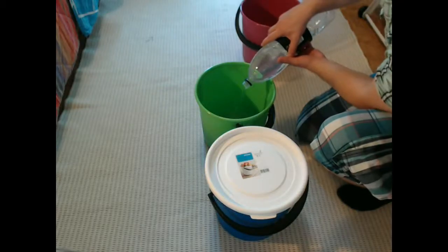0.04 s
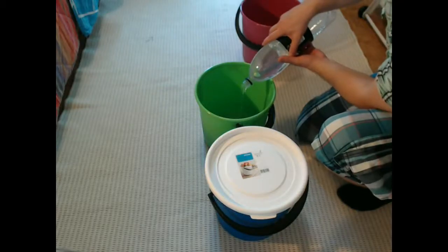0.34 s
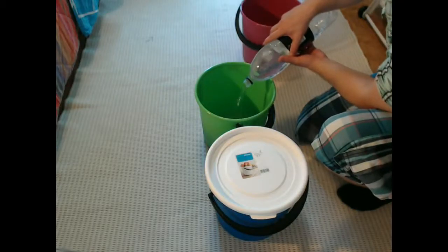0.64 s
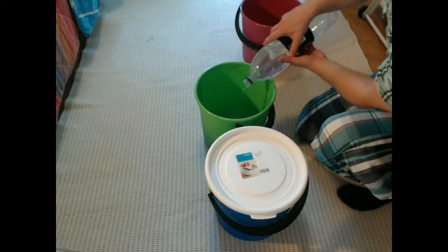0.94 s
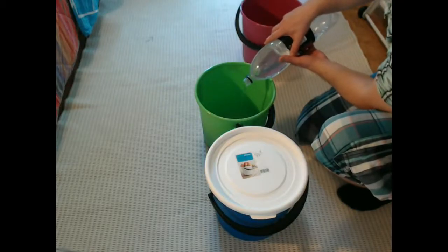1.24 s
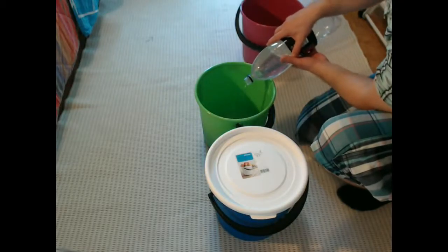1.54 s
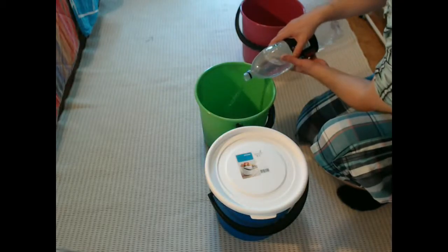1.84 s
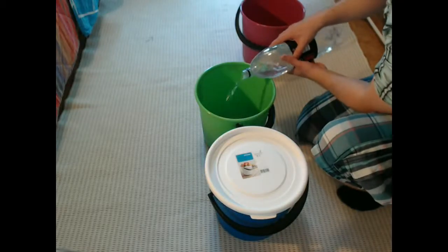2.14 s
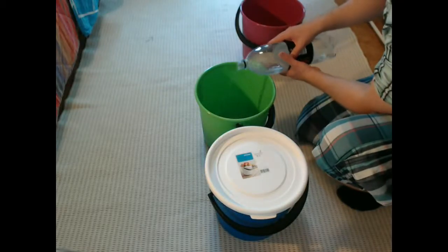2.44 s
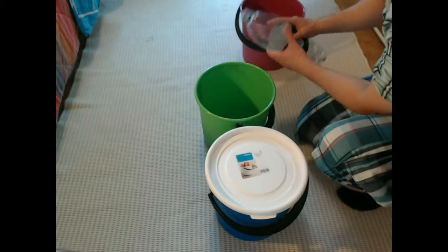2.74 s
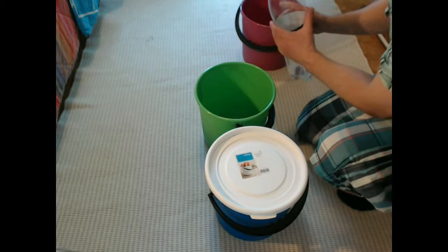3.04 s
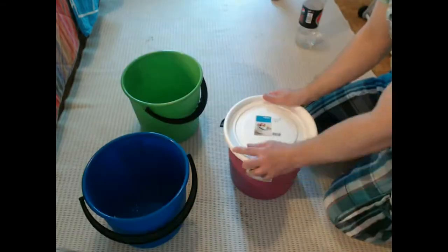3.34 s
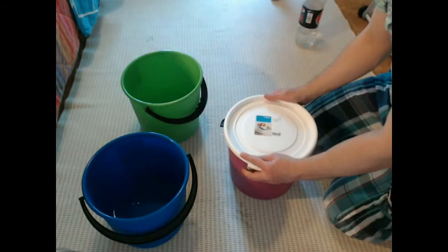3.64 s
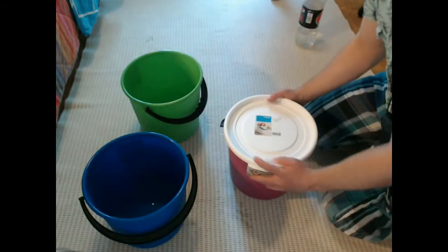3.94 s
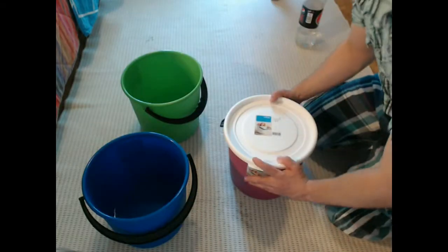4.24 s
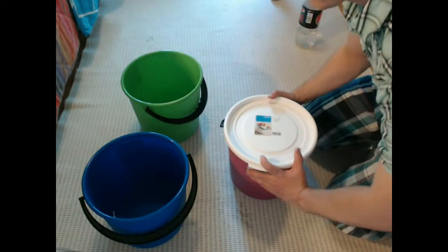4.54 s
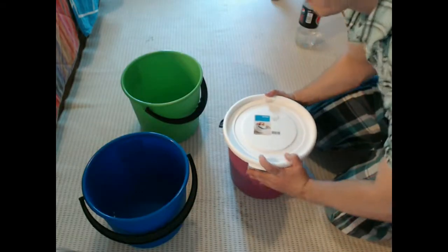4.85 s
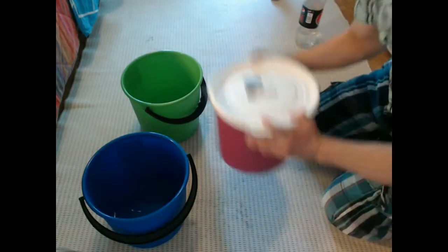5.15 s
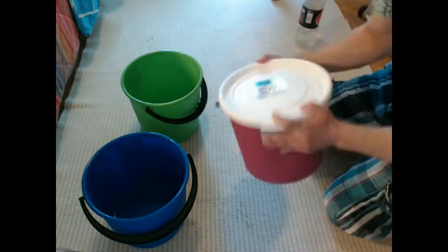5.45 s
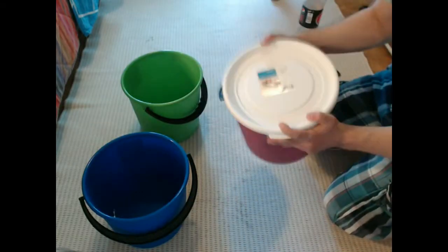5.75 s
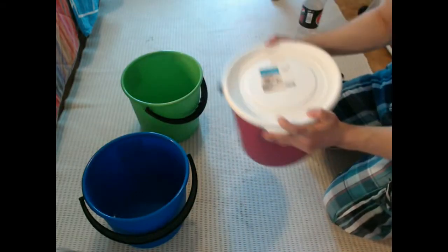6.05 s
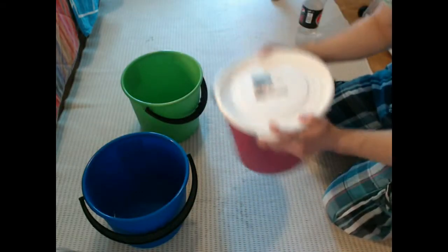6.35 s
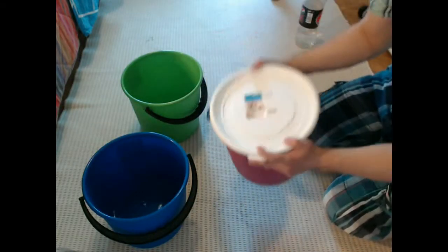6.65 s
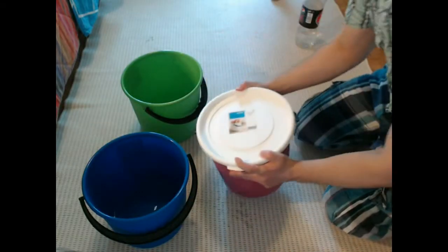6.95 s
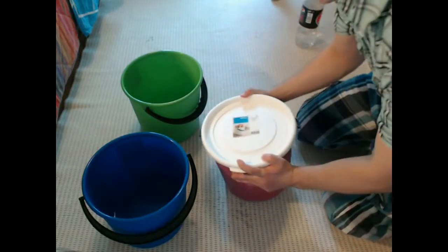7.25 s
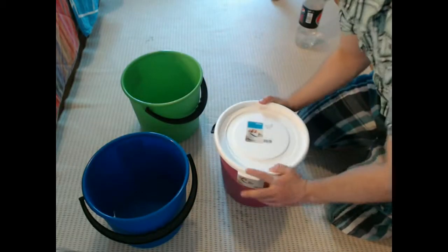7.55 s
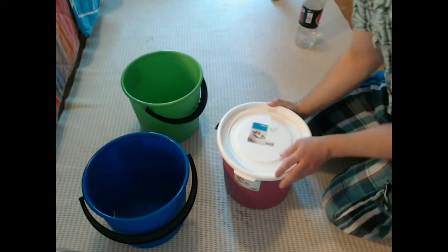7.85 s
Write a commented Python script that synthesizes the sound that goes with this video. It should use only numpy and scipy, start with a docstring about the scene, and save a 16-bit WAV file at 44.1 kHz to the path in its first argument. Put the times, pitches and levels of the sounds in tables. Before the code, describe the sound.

Liquid glugs from a bottle into a plastic bucket, then a lid is pressed on a bucket and liquid is shaken inside with hollow booms.

```python
"""Liquid glugs from a plastic bottle into an empty plastic bucket in a small room: it drums on the
bottom, churns up bubbles and spits drops. Hands rub and knock on the plastic as they press a lid onto
a bucket, lift it and shake it; the liquid slaps the walls and the lid booms like a drum head.
The bucket is set down on a mat, and at the very end a shower head sprays into a bucket."""
import sys
import numpy as np
from scipy import signal
from scipy.fft import rfft, irfft, next_fast_len
from scipy.io import wavfile

SR = 44100
rng = np.random.default_rng(int(sys.argv[2]) if len(sys.argv) > 2 else 0)


def file_out(sig):
    """Save sig as 16-bit WAV at sys.argv[1]."""
    # one column per channel
    cols = np.atleast_2d(sig).T
    # limit, then scale
    lim = np.clip(cols, -1, 1)
    pcm = np.round(lim * 32767).astype(np.int16)
    wavfile.write(sys.argv[1], SR, pcm)


N = 357252
T = np.arange(N) / SR
TOP_HZ = 16100


def amp(db):
    return 10 ** (np.asarray(db) / 20)


def unit_rms(x):
    return x / np.sqrt(np.mean(x ** 2) + 1e-20)


def at_hz(table, hz):
    table_hz, values = np.transpose(table)
    return np.interp(np.log(hz + 1), np.log(table_hz + 1), values)


def add(mix, start_s, sound):
    part = mix[max(round(start_s * SR), 0):][:len(sound)]
    part += sound[:len(part)]


def decay(t, hold_s, t60_s):
    return np.exp(-np.log(1000) * np.maximum(t - hold_s, 0) / t60_s)


def swell(t, rise_s, t60_s):
    """Smooth rise to 1, then exponential decay."""
    return np.sin(np.pi / 2 * np.clip(t / rise_s, 0, 1)) ** 2 * decay(t, rise_s, t60_s)


def coloured(x, spectrum):
    """x shaped by a spectrum table; rms 1."""
    size = next_fast_len(N)
    gain = amp(at_hz(spectrum, np.fft.rfftfreq(size, 1 / SR)))
    return unit_rms(irfft(rfft(x, size) * gain, size)[:N])


def filtered(x, hz, kind):
    """Low- or high-passed x; rms 1."""
    return unit_rms(signal.sosfilt(signal.butter(4, hz, kind, fs=SR, output="sos"), x))


def ring(modes):
    """Impulse response of damped modes; energy 1."""
    t = np.arange(SR // 3) / SR
    out = sum(amp(db) * swell(t, 1 / SR, t60_s) * np.cos(2 * np.pi * hz * t) for hz, db, t60_s in modes)
    return out / np.linalg.norm(out)


def impacts(per_s, spread_db):
    """Clicks of random time, size and sign."""
    size = amp(spread_db * np.minimum(rng.exponential(1, N), 3))
    return size * rng.choice([-1, 1], N) * (rng.random(N) < per_s / SR)


def bubble(hz, cycles, glide):
    """Sine falling to 1/e in `cycles`; its pitch climbs as the bubble nears the surface."""
    age = np.arange(int(5 * cycles / hz * SR) + 2) * hz / cycles / SR
    return np.exp(-age) * np.sin(2 * np.pi * cycles * age * (1 + glide * age))


def bubbles(per_s, spread_db, low_hz, high_hz, cycles, glide, sizes=48):
    """Stream of bubbles of many sizes, equal energy per Hz."""
    clicks = impacts(per_s, spread_db)
    size_index = rng.integers(0, sizes, N)
    onsets = np.flatnonzero(clicks)
    out = np.zeros(N)
    for k, hz in enumerate(np.geomspace(low_hz, high_hz, sizes)):
        grain = hz * bubble(hz, cycles, glide)
        starts = onsets[size_index[onsets] == k]
        samples = starts[:, None] + np.arange(len(grain))
        out += np.bincount(samples.ravel(), np.outer(clicks[starts], grain).ravel(), N)[:N]
    return out


# room air and rumble spectra: (frequency [Hz], gain [dB])
AIR_SPECTRUM = [(65, -48), (110, 1.5), (144, 5.5), (201, -2), (275, 1), (417, -10.5), (848, -18),
                (1370, -9.5), (2400, -32.5), (4980, -24.5), (6260, -31.5), (12000, -35), (16000, -38)]
RUMBLE_SPECTRUM = [(10, -23), (25, -1), (48, 3.5), (62, -16), (90, 0.5), (125, -11), (250, -54),
                   (1000, -80)]
# rumble envelope: (time [s], level [dB])
RUMBLE_LEVELS = [(0, -68), (1.5, -65.5), (2.2, -63), (3.1, -66), (5.2, -65), (7.6, -60), (8.1, -71)]

def background(air_db=-62):
    """Steady room air over a wavering rumble."""
    air, rumble = rng.standard_normal((2, N))
    times_s, levels_db = np.transpose(RUMBLE_LEVELS)
    rumble_gain = amp(np.interp(T, times_s, levels_db)) * (T <= times_s[-1])
    return amp(air_db) * coloured(air, AIR_SPECTRUM) + rumble_gain * coloured(rumble, RUMBLE_SPECTRUM)


# room reverberation: (frequency [Hz], t60 [s])
ROOM_DECAY = [(150, 0.32), (1000, 0.49), (4000, 0.34), (14000, 0.18)]

def room_tail(gap_s=0.002, taps_per_s=5000):
    """Sparse reflections, each band dying at its own rate; energy 1."""
    size = SR * 2 // 3
    taps = rng.standard_normal(size) * (rng.random(size) < taps_per_s / SR)
    taps *= np.arange(size) > gap_s * SR
    hz, t, bands = signal.stft(taps, SR, nperseg=256)
    bands = bands * decay(t, 0, at_hz(ROOM_DECAY, hz)[:, None])
    tail = signal.istft(bands, SR, nperseg=256)[1]
    return tail / np.linalg.norm(tail)


def room(x, tails=4, crossfade_hz=2):
    """Several crossfaded tails give a smooth, even small-room reverberation."""
    turns = crossfade_hz * T + np.arange(tails)[:, None] / tails
    shares = np.maximum(np.cos(2 * np.pi * turns), 0)
    return sum(signal.oaconvolve(x * share, room_tail())[:N] for share in shares)


# spray in a bucket: (frequency [Hz], gain [dB])
SHOWER_SPECTRUM = [(100, -37), (210, -34), (290, 8.5), (350, -19), (480, -11), (800, -24), (1240, -12.5),
                   (1900, -18.5), (8500, -21.5), (16000, -26.5)]

def shower(start_s=7.96, rise_s=0.0017, level_db=-44):
    """Many fine jets patter into a bucket."""
    patter = coloured(impacts(per_s=9000, spread_db=2), SHOWER_SPECTRUM)
    return amp(level_db) * patter * np.clip((T - start_s) / rise_s, 0, 1)


# friction on plastic: (frequency [Hz], gain [dB])
RUB_SPECTRUM = [(180, -25), (300, -26), (326, 8), (455, -5.5), (1150, 1.5), (1560, -4.5), (2100, -5),
                (2360, -12), (4300, -14.5), (6620, -27.5), (8360, -25.5), (14200, -36), (16000, -38)]
# hand and cloth strokes: (midpoint [s], length [s], rub gain [dB], hiss gain [dB])
HAND_STROKES = [(3.021, 0.18, -64.5, -69), (3.18, 0.18, -62, -66.5), (3.35, 0.2, -62.5, -62.5),
                (3.45, .08, -55.5, -70), (3.628, 0.2, -54.5, -59), (3.894, 0.32, -56, -62.5),
                (4.097, 0.25, -58, -58.5), (4.228, .14, -56.5, -68.5), (4.47, 0.53, -62.5, -82),
                (4.674, 0.29, -62.5, -69), (4.925, 0.51, -62.5, -87), (5.346, 0.12, -63, -75),
                (7.417, 0.23, -56.5, -78), (7.554, 0.19, -56, -73), (7.74, 0.42, -67.5, -82),
                (7.93, 0.3, -60, -63.5)]

def rubbing(speed_exponent=1.3):
    """Skin and cloth catch and slip in tiny steps; loudness follows the speed of the hand."""
    power = np.zeros((2, N))
    for middle_s, length_s, *gains_db in HAND_STROKES:
        speed = np.sin(np.linspace(0, np.pi, int(length_s * SR), endpoint=False))
        for layer, db in zip(power, gains_db):
            add(layer, middle_s - length_s / 2, (amp(db) * speed ** speed_exponent) ** 2)
    rub_gain, hiss_gain = np.sqrt(power)
    slips = coloured(impacts(per_s=5000, spread_db=3.5), RUB_SPECTRUM)
    return (amp(-3.5) * rub_gain * filtered(slips, 3500, "low")
            + amp(-1.5) * hiss_gain * filtered(slips, 5220, "high"))


# plastic rim: (frequency [Hz], gain [dB], t60 [s])
RIM_MODES = [(970, 14.5, 0.061), (1170, 19.5, 0.27), (1756, -25, 0.28), (2110, -13, 0.59),
             (2503, -46, 0.27), (3284, -27, 0.15), (3914, -63, 0.098)]
# knocks, and a brief scrape at 4.92 s: (time [s], gain [dB], rattle pitch [Hz], extra click gain [dB])
RIM_KNOCKS = [(3.022, -49, 1690, 12.5), (3.604, -41.5, 1150, -17), (3.642, -46, 1290, 6),
              (3.975, -43.5, 840, -20), (4.221, -41, 615, -20), (4.271, -47.5, 482, -25),
              (4.635, -50, 690, -15), (4.916, -31, 1120, -31), (4.922, -43.5, 303, -30),
              (4.935, -42, 1250, -35), (5.03, -44.5, 620, -19), (7.514, -39, 1400, -15),
              (7.529, -36.5, 550, -19), (7.679, -42.5, 282, -14)]

def knocks():
    """Fingers and handle strike the plastic, and at 4.92 s something scrapes it briefly: each gives a click, a
    short rattle and the ringing rim."""
    out, t = np.zeros(N), np.arange(SR // 3) / SR
    rim = ring(RIM_MODES)
    rim /= abs(rim).max()
    for start_s, db, hz, click_db in RIM_KNOCKS:
        rattle, click = rng.standard_normal((2, len(t)))
        rattle = filtered(rattle, hz / 1.33, "high")
        rattle = filtered(rattle, hz * 1.12, "low") * swell(t, 0.0011, 0.096)
        click = filtered(click, 1600, "high") * swell(t, 0.00076, 0.029)
        add(out, start_s, amp(db) * (0.17 * rim + 0.4 * rattle + 0.39 * amp(click_db) * click))
    return out


# large bubbles in the puddle and the shaken liquid, plus two low rings of the closed bucket (6.373 s, 6.944 s):
# (time [s], level [dB], pitch [Hz])
BUBBLES_AND_RINGS = [(.172, -37, 1050), (.774, -40, 1174), (1.145, -41.5, 2590), (1.421, -38.5, 1950),
                     (1.823, -40, 2000), (2.085, -42.5, 870), (2.174, -38.5, 2060), (2.593, -40.5, 935),
                     (2.787, -45.5, 1310), (5.526, -33, 784), (5.555, -29.5, 870), (5.868, -33.5, 802),
                     (5.964, -20.5, 1123), (5.996, -24, 1216), (6.121, -30.5, 806), (6.244, -26, 1090),
                     (6.373, -30, 255), (6.944, -32.5, 281.6), (7.069, -29.5, 1213), (7.186, -40, 1950)]

def gurgles(climb_per_s=0.15, t60_cycles=52):
    """Large bubbles, and two low rings of the closed bucket, sound briefly, rising slightly in pitch."""
    out, t = np.zeros(N), np.arange(SR // 4) / SR
    for start_s, db, hz in BUBBLES_AND_RINGS:
        tone = np.sin(2 * np.pi * hz * t * (1 + climb_per_s * t))
        add(out, start_s, amp(db) * swell(t, 3 / hz, t60_cycles / hz) * tone)
    return out


# drops spat by the pour: (time [s], gain [dB], pitch [Hz], extra plop gain [dB])
SPAT_DROPS = [(0.0971, -28.5, 5800, -5.5), (0.1606, -26, 9040, -21), (0.196, -36, 5030, -19),
              (0.2104, -35, 8100, -9), (0.2833, -34.5, 4190, -35), (0.3068, -34, 8000, -17),
              (0.399, -35.5, 11300, -35), (0.614, -26.5, 7730, -16.5), (0.7122, -32, 4400, -15),
              (0.838, -37, 7900, -5.5), (0.9214, -36, 6900, -28), (0.9364, -24.5, 7800, -35),
              (0.996, -38, 3270, -6), (1.077, -40, 11400, -19), (1.1144, -38, 3720, -17),
              (1.16, -35.5, 4260, -19), (1.2434, -43, 4000, 5.5), (1.3214, -33, 8160, -20),
              (1.422, -35, 4240, -15), (1.4698, -24, 5300, -37), (1.6382, -31, 4400, -25),
              (1.6898, -33, 6950, -23), (1.7386, -39.5, 4340, 1), (1.766, -33, 4500, -28),
              (1.9119, -32, 6600, -10), (1.9783, -33, 5460, -18), (2.155, -38, 3230, -5.5),
              (2.308, -30.5, 8250, -34), (2.418, -33.5, 4900, -11), (2.446, -33, 8300, -24),
              (2.5884, -30, 5150, -11.5), (2.6727, -35, 5800, -28), (2.7051, -34.5, 12100, -13),
              (2.7398, -38.5, 2950, -12), (2.8762, -44, 4380, -27), (3.0202, -46, 8300, -23)]

def drops(tick_band_ratio=1.6):
    """Each drop gives a hard tick, a tiny ringing bubble and a duller plop on the plastic."""
    out, t = np.zeros(N), np.arange(SR // 30) / SR
    plop = ring([(977, -1.3, 0.017), (1250, 1, 0.033), (1950, -0.45, 0.023)])
    plop /= abs(plop).max()
    burst = swell(t, 0.0011, 0.0046) + amp(-9) * swell(t, 0.0066, 0.014)  # impact, then crown collapse
    for start_s, db, hz, plop_db in SPAT_DROPS:
        band_hz = [hz / tick_band_ratio, min(hz * tick_band_ratio, TOP_HZ)]
        band = signal.butter(1, band_hz, "band", fs=SR, output="sos")
        tick = filtered(signal.sosfilt(band, rng.standard_normal(len(t))), 2370, "high")
        add(out, start_s, amp(db - 6) * tick * burst)
        add(out, start_s, amp(db - 2) * bubble(hz, cycles=9, glide=0.01))
        add(out, start_s, amp(db + plop_db + 8) * plop)
    return out


# hardest waves: (time [s], level [dB])
WALL_SLAPS = [(5.524, -27.5), (6.093, -30)]

def slaps(low_hz=80, high_hz=910, t60_s=0.14):
    """A mass of liquid meets the wall all at once: a short, dull burst."""
    out, t = np.zeros(N), np.arange(SR // 3) / SR
    for start_s, db in WALL_SLAPS:
        noise = filtered(rng.standard_normal(len(t)), low_hz, "high")
        add(out, start_s, amp(db) * filtered(noise, high_hz, "low") * swell(t, 0.002, t60_s))
    return out


# air and walls of the closed bucket: (frequency [Hz], gain [dB], t60 [s])
CLOSED_BUCKET_MODES = [(93, -4, .12), (123, 12, 0.087), (146, 3.5, 0.28), (166.9, -1, 0.57),
                       (255, -4, 0.25), (260, -23, 0.082), (334.5, -7, 0.12), (360, -46.5, 0.35)]
# shaken liquid: (frequency [Hz], gain [dB])
SLOSH_SPECTRUM = [(240, -86), (400, -19), (708, -10.5), (777, -5.5), (879, -11.5), (1160, -2), (1710, -8),
                  (2470, -13), (3640, -18.5), (4380, -12), (7060, -22), (8110, -17.5), (10100, -27.5),
                  (14800, -24.5), (16000, -66)]
# waves hitting the wall: (time [s], gain [dB], rise [s], t60 [s], extra spray gain [dB])
WAVES = [(5.469, -51, 0.0034, 0.58, -9), (5.508, -47, 0.0072, .2, 3), (5.525, -25.5, 0.0013, 0.24, -11),
         (5.603, -31, 0.043, 0.45, -9), (5.792, -37.5, 0.032, 0.6, -3.5), (5.854, -35.5, 0.011, 0.04, 2),
         (5.949, -30.5, 0.022, 0.33, -10), (6.08, -29, 0.045, 0.24, -5.5), (6.215, -30.5, .028, 0.46, -10),
         (6.36, -39, 0.025, 0.49, -2), (6.507, -36, 0.0032, 0.34, -8.5), (6.52, -34, 0.023, 0.33, -7.5),
         (6.64, -42.5, 0.07, 0.14, -3.5), (6.703, -35.5, 0.0024, 0.3, -3.5),
         (6.862, -40.5, 0.049, 0.85, -9.5), (7.055, -41.5, 0.0065, 0.34, -16),
         (7.183, -50.5, 0.005, 0.14, -28)]

def sloshes():
    """Each wave breaks into bubbles and spray, and stirs the air in the closed bucket."""
    power, t = np.zeros((2, N)), np.arange(SR) / SR
    for start_s, db, rise_s, t60_s, spray_db in WAVES:
        wave = amp(db) * swell(t, rise_s, t60_s)
        add(power[0], start_s, wave ** 2)
        add(power[1], start_s, (amp(spray_db) * wave) ** 2)
    wave_gain, spray_gain = np.sqrt(power)
    churn = bubbles(per_s=2200, spread_db=4, low_hz=385, high_hz=3340, cycles=9, glide=0.0099)
    spray = bubbles(per_s=6000, spread_db=2, low_hz=3055, high_hz=14800, cycles=5.3, glide=0.021)
    wall_hits = wave_gain * unit_rms(impacts(per_s=820, spread_db=-0.5))
    hollow = signal.oaconvolve(wall_hits, ring(CLOSED_BUCKET_MODES))[:N]
    return (amp(-2) * wave_gain * coloured(churn, SLOSH_SPECTRUM)
            + amp(-0.5) * spray_gain * coloured(spray, SLOSH_SPECTRUM)
            + amp(0.5) * hollow)


# lid: (frequency [multiple of pitch], gain [dB])
LID_MODES = [(0.998, 1), (1.73, -14), (2.22, -20)]
# blows on the lid: (time [s], level [dB], pitch [Hz], rise [s], t60 [s], floor re boom [dB])
LID_BLOWS = [(3.214, -47.5, 132, 0.013, 0.44, -11), (3.634, -44.5, 136, 0.019, 0.19, -4),
             (4.075, -46.5, 143, 0.01, 0.26, -20), (4.19, -49.5, 144, 0.018, 0.43, -20),
             (5.21, -50.5, 149, 0.019, 0.28, -46), (5.52, -26, 117, 0.0063, 0.13, -20),
             (5.641, -23, 153.5, 0.045, 0.091, -23), (5.815, -18, 146, 0.036, 0.059, -26),
             (5.926, -25, 152.9, 0.034, 0.45, -35), (6.088, -16.5, 152.6, 0.019, 0.31, -12),
             (6.24, -19.5, 152, 0.019, 0.2, -41), (6.373, -33.5, 130, 0.023, 0.37, -10),
             (6.508, -34, 146, 0.0067, 0.81, -25), (6.697, -26, 153.5, 0.032, 0.066, -37),
             (6.741, -29, 167.5, 0.012, 0.12, -31), (6.919, -39.5, 141, 0.05, 0.36, -15),
             (7.282, -31.5, 124.1, 0.017, 0.41, -17), (7.572, -41, 123.2, 0.004, 0.35, -2)]

def lid_booms(sag=0.037, sag_s=0.039, floor_hz=48, floor_t60_s=0.31):
    """The lid booms like a drum head, its pitch sagging as the blow relaxes; the floor shudders."""
    out, t = np.zeros(N), np.arange(SR * 2 // 3) / SR
    shudder = swell(t, 0.028, floor_t60_s) * np.sin(2 * np.pi * floor_hz * t)
    for start_s, db, hz, rise_s, t60_s, floor_db in LID_BLOWS:
        pitch_hz = hz * (1 + sag * (np.exp(-t / sag_s) - 0.5))
        phase = 2 * np.pi * np.cumsum(pitch_hz) / SR
        hardness = amp(db + 17.5)  # soft blows hardly wake the upper modes
        for ratio, mode_db in LID_MODES:
            mode = swell(t, rise_s, t60_s / ratio) * np.sin(ratio * phase)
            add(out, start_s, amp(db + mode_db) * hardness ** (ratio - 1) * mode)
        add(out, start_s, amp(db + floor_db) * shudder)
    return out


# open bucket: (frequency [Hz], gain [dB], t60 [s])
OPEN_BUCKET_MODES = [(293, 6, 0.13), (306, -17, 0.061), (333.7, 1.5, 0.1), (344, -3, 0.39),
                     (476, -15, 0.15), (587, -9.5, 0.059), (768, -18.5, 0.24), (904, -13, 0.044)]
# splashing in the bucket: (frequency [Hz], gain [dB])
POUR_SPECTRUM = [(260, -41), (450, -46), (485, -7), (694, -10.5), (771, -2.5), (830, -12), (950, 1),
                 (1580, -5.5), (2010, -7), (3540, -15), (5140, -6.5), (6930, -13), (8290, -7), (14600, -13),
                 (16000, -10.5)]
# slugs of liquid: (time [s], length [s], drum gain [dB], churn gain [dB], spray gain [dB])
BOTTLE_GLUGS = [(0.0, 0.048, -47, -55, -68), (0.088, .015, -58, -42.5, -48),
                (0.151, 0.066, -43.5, -44, -52), (0.336, 0.053, -51, -54, -51),
                (0.469, 0.035, -56.5, -60, -51.5), (0.558, 0.099, -49.5, -52.5, -50),
                (0.701, 0.04, -53, -56, -56), (0.772, 0.036, -40.5, -48, -73),
                (0.845, 0.027, -43.5, -53, -72), (0.971, 0.092, -45.5, -57, -63),
                (1.101, 0.058, -55, -53.5, -51.5), (1.187, 0.044, -47.5, -55, -68),
                (1.237, 0.062, -43.5, -43, -57), (1.42, 0.063, -48, -51.5, -45),
                (1.502, .05, -48, -50, -48), (1.607, 0.065, -53, -62, -52.5),
                (1.733, .035, -44.5, -47.5, -47.5), (1.791, 0.061, -51, -47.5, -51),
                (1.882, 0.05, -53.5, -56, -67), (2.006, 0.12, -50, -54, -46.5),
                (2.141, 0.036, -52.5, -47, -45.5), (2.4, 0.082, -50.5, -50.5, -42),
                (2.581, .02, -44, -43.5, -46), (2.64, 0.15, -55, -55, -48.5)]

def pour(rise_s=0.011, glug_t60_s=0.12, trickle_end_s=2.725, trickle_t60_s=0.25):
    """Glugs over a thin trickle drum on the bucket bottom, churn the puddle and throw spray."""
    onset = np.clip(T / rise_s, 0, 1)
    trickle = onset * decay(T, trickle_end_s, trickle_t60_s)
    trickle_gains_db = (-60, -63.5, -56.5)  # drum, churn, spray
    power = np.outer(amp(trickle_gains_db), trickle) ** 2
    for start_s, length_s, *gains_db in BOTTLE_GLUGS:
        glug = onset[:SR // 2] * decay(T[:SR // 2], length_s, glug_t60_s)
        for layer, db in zip(power, gains_db):
            add(layer, start_s, (amp(db) * glug) ** 2)
    drum_gain, churn_gain, spray_gain = np.sqrt(power)

    bottom = ring(OPEN_BUCKET_MODES)
    bottom_hits = drum_gain * unit_rms(impacts(per_s=700, spread_db=4))
    drum = amp(-2) * signal.oaconvolve(bottom_hits, bottom)[:N]
    for start_s, _, drum_db, _, _ in BOTTLE_GLUGS:  # first blow of each slug
        add(drum, start_s + rise_s / 2, amp(drum_db + 6) * bottom / abs(bottom).max())
    churn = bubbles(per_s=1300, spread_db=4.5, low_hz=480, high_hz=3300, cycles=6, glide=0.02)
    spray = bubbles(per_s=1200, spread_db=6.5, low_hz=3000, high_hz=15500, cycles=5, glide=0.015)
    wall_ticks = 0.5 * filtered(impacts(per_s=440, spread_db=5), 2200, "high")
    splash = (churn_gain * coloured(churn, POUR_SPECTRUM)
              + spray_gain * coloured(unit_rms(spray) + wall_ticks, POUR_SPECTRUM))
    return drum + amp(-3.5) * splash


def scene():
    """All sources and their room reflections, mono."""
    liquid = pour() + sloshes() + slaps() + gurgles()
    ticks = drops()
    clatter = knocks() + rubbing() + shower()
    booms = lid_booms()
    echo = room(amp(-7.5) * liquid + amp(-6) * ticks + amp(-6.5) * clatter + amp(-8) * booms)
    return (liquid + ticks + clatter + booms + echo + background())[None]


def record(dry):
    """Steep low-pass at TOP_HZ."""
    lowpass = signal.firwin(301, TOP_HZ, window=("kaiser", 9), fs=SR)
    return signal.oaconvolve(dry, lowpass[None], "same")


dry = scene()
out = record(dry)
file_out(out)
```